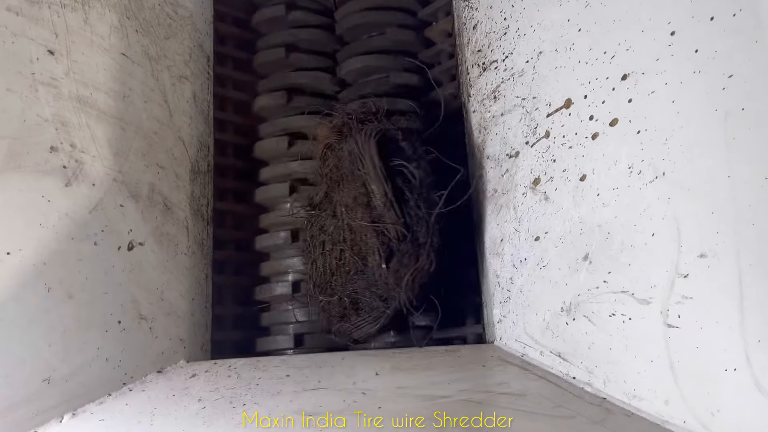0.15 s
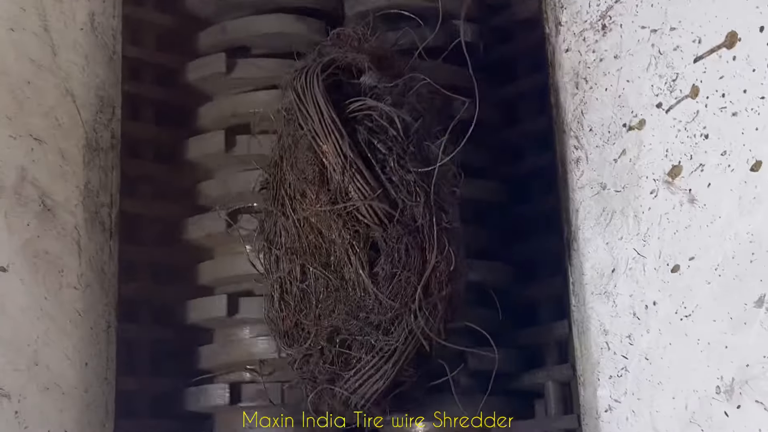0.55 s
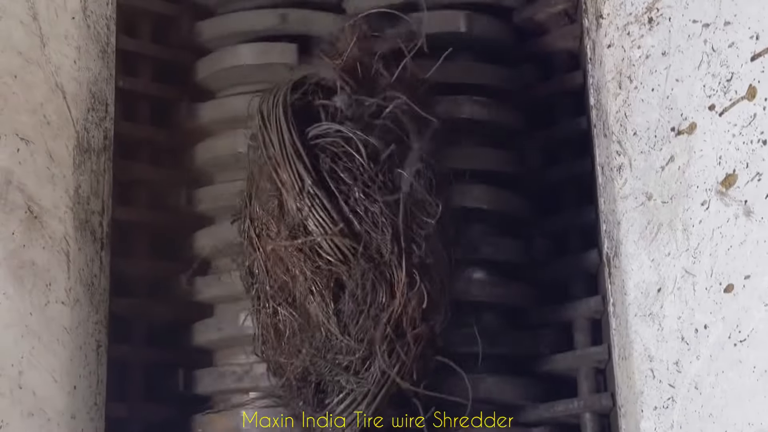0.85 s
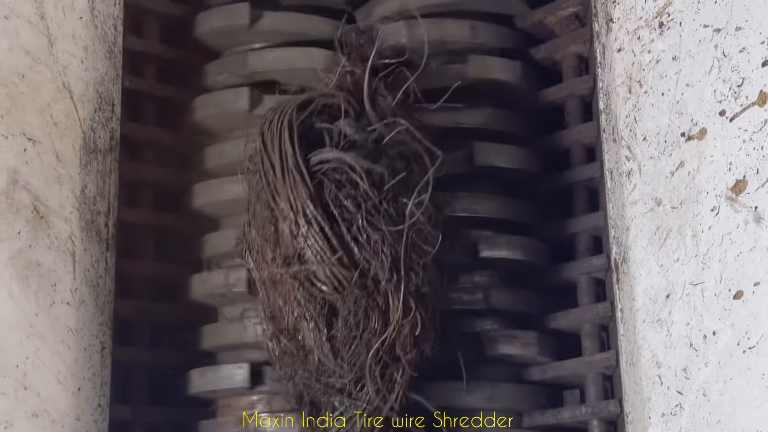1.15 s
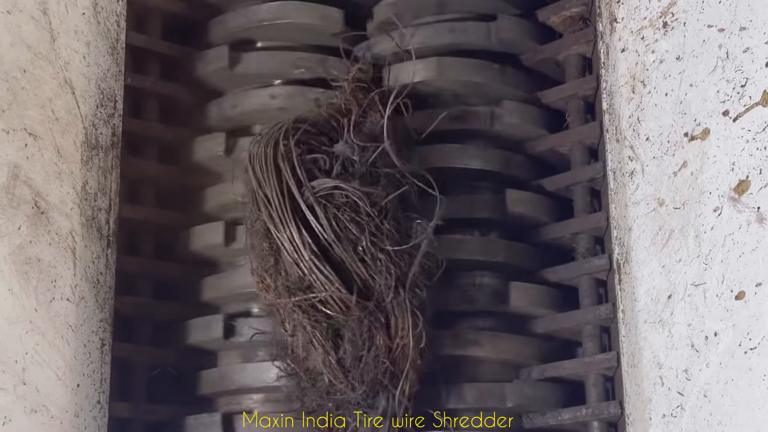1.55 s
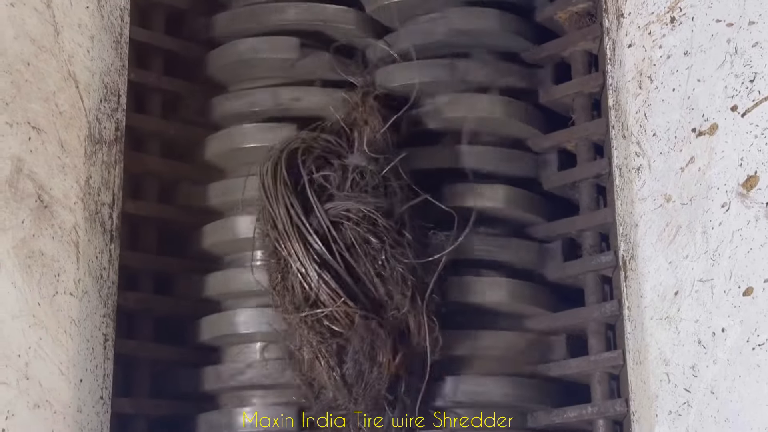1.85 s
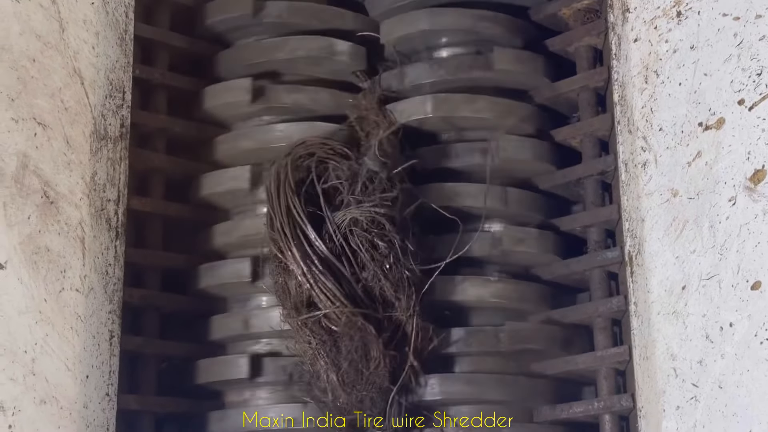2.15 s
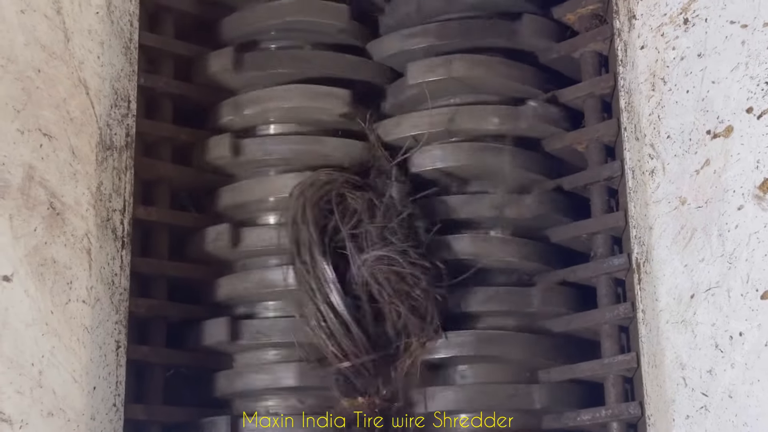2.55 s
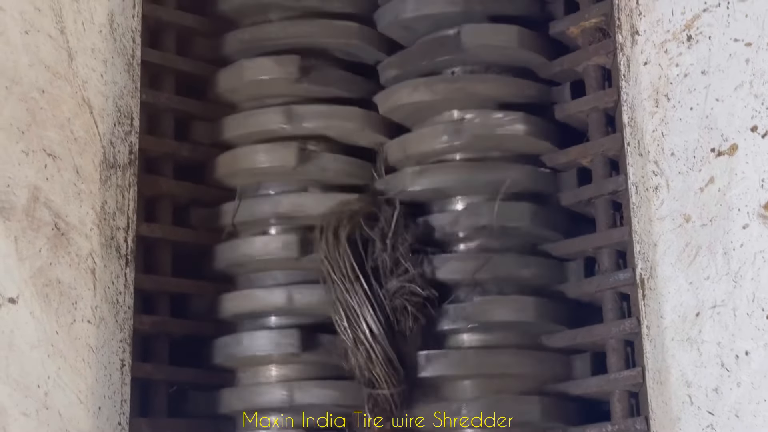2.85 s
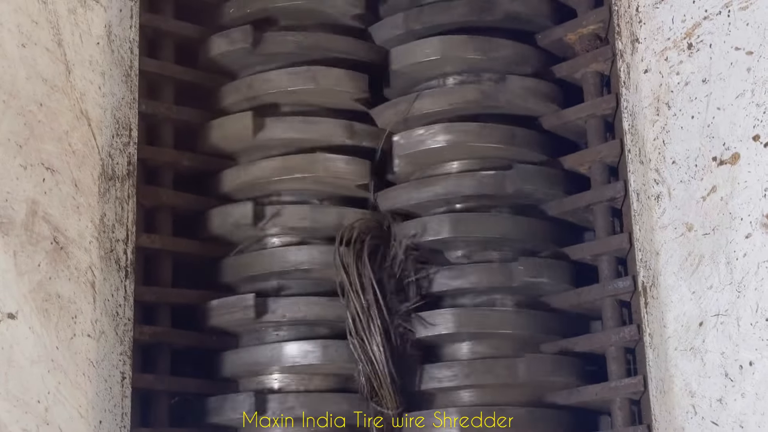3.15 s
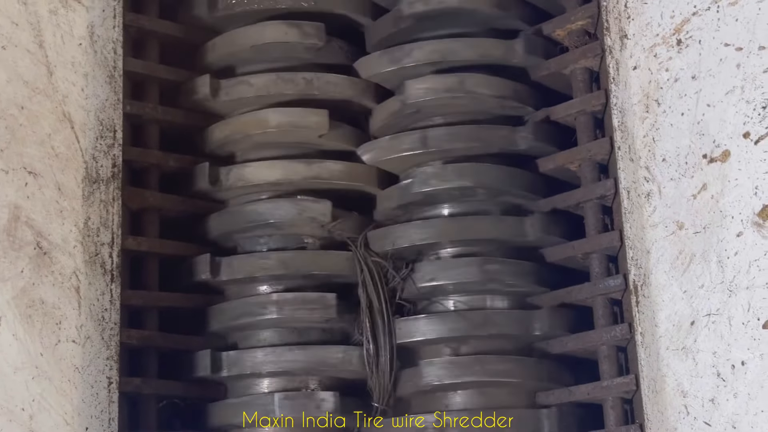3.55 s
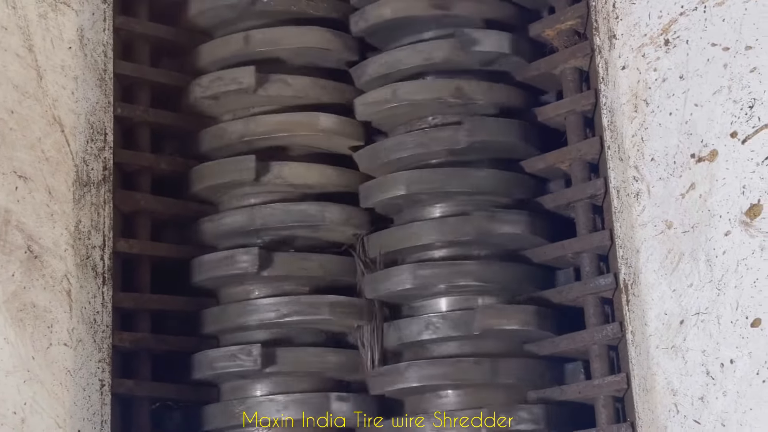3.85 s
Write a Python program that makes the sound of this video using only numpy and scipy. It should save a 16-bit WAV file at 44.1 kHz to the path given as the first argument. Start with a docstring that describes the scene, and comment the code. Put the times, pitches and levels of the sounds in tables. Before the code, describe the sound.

A heavy shredder crunches and snaps steel wire in surges over a low motor hum.

```python
"""Steel wire in a twin-shaft shredder

A stereo microphone just above the steel hopper. About twice a second the cutters bite into a bundle
of wire: strands crackle and snap, and the frame thuds, groans and rings. Loose wire rustles between
the bites, over the swelling hum and rumble of the drive; all eases as the bundle is used up."""
import sys
import numpy as np
from scipy import signal
from scipy.fft import rfft, irfft, next_fast_len
from scipy.io import wavfile

SR = 44100
rng = np.random.default_rng(int(sys.argv[2]) if len(sys.argv) > 2 else 0)


def store_pcm(level_fs):
    """Save levels as 16-bit WAV."""
    pcm = np.round(np.clip(level_fs, -1, 1) * 32767).astype(np.int16)
    wavfile.write(sys.argv[1], SR, np.atleast_2d(pcm).T)


N = 176400
TIME = np.arange(N) / SR


def from_db(db):
    """Decibels to gain."""
    return 10 ** (np.asarray(db) / 20)


def rms_one(x):
    """Scale to rms 1."""
    return x / np.sqrt(np.mean(x ** 2) + 1e-20)


def in_time(rows):
    """Join (seconds, value) rows by straight lines."""
    return np.interp(TIME, *np.transpose(rows))


def at_hz(rows, hz):
    """Read (Hz, value) rows on a log-frequency axis."""
    row_hz, value = np.transpose(rows)
    return np.interp(np.log(hz + 1), np.log(row_hz), value)


def drift(rate_hz):
    """Slow random wander of rms 1."""
    step, settle = 40, 2000
    pole = np.exp(-2 * np.pi * rate_hz * step / SR)
    noise = rng.standard_normal(N // step + settle + 2)
    slow = signal.lfilter([1], [1, -2 * pole, pole * pole], noise)[settle:]
    return np.interp(np.arange(N) / step, np.arange(len(slow)), rms_one(slow))


def swell(start, length, rise, fall):
    """Build up to the start, hold and let go; all times in seconds."""
    return np.exp(np.minimum(TIME - start, 0) / rise - np.maximum(TIME - start - length, 0) / fall)


def burst(start, rise, t60):
    """Two unrelated noises that strike and die away together."""
    return rng.standard_normal((2, N)) * swell(start, 0, rise, fall=t60 / np.log(1000)) + 1e-18


def bandpass(x, low_hz, high_hz, order=1):
    """Keep the band between two frequencies."""
    return signal.sosfilt(signal.butter(order, [low_hz, high_hz], "band", fs=SR, output="sos"), x)


def resonate(x, hz, t60):
    """One ringing mode that falls 60 dB in t60 seconds."""
    radius, angle = from_db(-60 / (t60 * SR)), 2 * np.pi * hz / SR
    return signal.lfilter([1, 0, -1], [1, -2 * radius * np.cos(angle), radius ** 2], x)


def cracks(per_s, spread_db):
    """Random clicks of uneven size; rms 1."""
    sizes = from_db(spread_db * np.minimum(rng.exponential(1, N), 4)) * rng.choice([-1, 1], N)
    return rms_one(sizes * (rng.random(N) < per_s / SR))


def hopper(clicks, t60, direct):
    """Each click is a brief crack followed by dense reflections between the steel walls."""
    t = TIME[:SR // 3]
    crack, tail = from_db(-60 * t / 0.0057), from_db(-60 * t / t60)
    echo = rng.standard_normal((2, len(t))) * (direct * rms_one(crack) + rms_one(tail))
    echo /= np.sqrt(np.sum(echo ** 2, axis=1, keepdims=True))
    return signal.fftconvolve(clicks[None], echo, axes=1)[:, :N]


def crackle(per_s, spread_db, direct, places):
    """Steady crackle from several places along the cutters; rms 1."""
    spots = (cracks(per_s / places, spread_db) for _ in range(places))
    return rms_one(sum(hopper(clicks, t60=0.091, direct=direct) for clicks in spots))


# How alike left and right sound. Each row: frequency in Hz, coherence from 0 to 1.
STEREO_COHERENCE = [(110, .9995), (170, .998), (270, .985), (450, .83), (740, .66), (1200, .56),
                    (1800, .96), (2300, .93), (3500, .93), (4400, .94), (5800, .86), (8500, .88),
                    (11500, .97), (15000, .87)]
# The microphone's left port against its right. Each row: frequency in Hz, phase lead in radians.
PORT_PHASE = [(300, 0), (450, -.2), (600, -.6), (850, -.6), (1210, 0), (1460, .1), (1800, 0), (5400, -.1),
              (7000, -1.2), (9000, -2.3), (10300, -3.0), (13300, -3.2), (15500, -4.2)]
# Left over right. Each row: frequency in Hz, gain in dB.
STEREO_BALANCE = [(800, 0), (1250, -3), (1900, 0)]
def to_stereo(pair, colour=((1, 0), (SR, 0))):
    """Colour two unrelated signals at constant power and blend them into left and right."""
    size = next_fast_len(N + SR // 10)
    hz = np.arange(size // 2 + 1) * SR / size
    mid, side = rfft(pair, size) * rms_one(from_db(at_hz(colour, hz)))
    alike = at_hz(STEREO_COHERENCE, hz)
    mid *= np.sqrt((1 + alike) / 2)
    side *= np.sqrt((1 - alike) / 2)
    lean = np.exp(.5j * at_hz(PORT_PHASE, hz)) * from_db(at_hz(STEREO_BALANCE, hz) / 2)
    return irfft(np.array([(mid + side) * lean, (mid - side) / lean]), size)[:, :N]


# The drive's hum, dead centre, and its rumble. Each row: time in seconds, relative level in dB.
HUM_LEVEL = [(0.0, -14), (0.21, -40), (0.23, -14), (0.3, -7.5), (0.56, -12.5), (0.63, -23), (0.73, -8),
             (0.77, -17), (0.81, -6.5), (0.9, -5.5), (0.95, -16.5), (1.07, -6), (1.15, -7.5), (1.21, -24),
             (1.25, -19), (1.4, -9.5), (1.43, -18), (1.49, -8), (1.79, -11), (1.83, -21), (1.98, -10),
             (2.02, -24.5), (2.16, -12.5), (2.27, -27), (2.32, -20), (2.49, -14), (2.73, -41), (2.91, -13),
             (3.0, -15.5), (3.02, -20), (3.13, -17), (3.19, -28.5), (3.4, -28), (3.45, -14.5), (3.6, -27),
             (4.0, -37.5)]
RUMBLE_LEVEL = [(0, -13), (.22, -33.5), (.42, -20.5), (.55, -27.5), (1.2, -36), (1.35, -19), (1.55, -28),
                (1.73, -37), (1.83, -24), (2.03, -24.5), (2.22, -39), (2.37, -19.5), (2.57, -30.5),
                (2.95, -25), (3.2, -37), (3.93, -46), (4, -32)]
# The note of the hum. Each row: time in seconds, pitch in Hz.
HUM_PITCH = [(0, 112.9), (.3, 110.2), (.62, 111.9), (.8, 108.9), (1.05, 111.2), (1.35, 103.7), (1.5, 109.8),
             (1.75, 113), (1.95, 101), (2.12, 106.8), (2.3, 112.8), (2.52, 103.8), (2.9, 108), (3.2, 112.1),
             (3.5, 110), (4, 111.3)]
# The rumble at the microphone. Each row: frequency in Hz, relative level in dB.
RUMBLE_COLOUR = [(20, -41), (35, -35), (48, -29.5), (60, -7), (72, -12.5), (85, 1.5), (100, 0),
                 (130, -21.5), (200, -23), (600, -62)]
def drive():
    """A strong fluttering hum that sags under load, on top of a low rumble."""
    phase = 2 * np.pi * np.cumsum(in_time(HUM_PITCH) + 0.94 * drift(10)) / SR
    roughness = 0.1 * drift(25)
    flutter_hz = 23 + 3 * drift(2.25)
    flutter = 0.022 * np.sin(2 * np.pi * np.cumsum(flutter_hz) / SR)
    hum = np.sqrt(2) * from_db(in_time(HUM_LEVEL) + 0.3) * (1 + roughness + flutter) * np.sin(phase)
    rumble = to_stereo(rng.standard_normal((2, N)), RUMBLE_COLOUR)
    return hum + from_db(in_time(RUMBLE_LEVEL) + 4.5) * rumble


# The gearbox, faint and central. Each row: pitch in Hz, average level in dB.
GEAR_TONES = [(179, -44.5), (332, -40), (382, -41.5), (469, -39), (595, -41), (640, -42.5), (838, -50.5),
              (964, -76)]
def gearbox(load_db):
    """The gears whine in rough, wavering tones, stronger under load."""
    tones = 0
    for hz, db in GEAR_TONES:
        level = from_db(db + 3 * drift(35))
        pitch = hz + 6.18 * drift(26)
        tones += level * np.sin(2 * np.pi * np.cumsum(pitch) / SR)
    return np.sqrt(2) * tones * from_db(0.79 * (load_db - load_db.mean()))


def cutter_hiss():
    """The turning cutters hiss steadily, with a faint high ring."""
    colour = [(1500, 4), (3500, -3), (4600, -18), (4930, 11), (5300, -19), (8000, 2), (16000, -1)]
    return from_db(-56) * to_stereo(rng.standard_normal((2, N)), colour)


# The bundle dragging, down in the hopper. Each row: time in seconds, level in dB.
DRAG_LEVEL = [(0, -30), (.5, -32.5), (.62, -28), (.87, -33.5), (1.0, -32), (1.12, -32.5), (1.24, -26.5),
              (1.5, -34.5), (1.63, -40), (1.8, -55), (2.07, -25.5), (2.15, -37.5), (2.3, -26),
              (2.52, -29.5), (2.68, -36), (2.87, -29), (2.96, -27.5), (3.02, -32.5), (3.22, -45.5),
              (3.3, -43), (3.41, -34), (3.48, -41), (3.52, -47), (3.6, -51), (3.7, -47), (3.95, -49),
              (3.965, -35), (4, -41)]
# That scrape from above. Each row: frequency in Hz, relative level in dB.
DRAG_COLOUR = [(200, -10), (600, 6.5), (1020, 2), (1400, 0), (2200, -1), (3200, -5), (5000, -10.5),
               (8000, -13.5), (11000, -22), (16000, -35)]
def drag():
    """The bundle scrapes along the cutters in a dense, even crackle."""
    scrape = crackle(per_s=1100, spread_db=0.5, direct=0.9, places=3)
    return to_stereo(from_db(in_time(DRAG_LEVEL)) * scrape, DRAG_COLOUR)


# Loose wire close under the microphone. Each row: time in seconds, relative level in dB.
RUSTLE_LEVEL = [(0, -28), (.08, -31.5), (.13, -25), (.27, -22), (.33, -31), (.44, -36), (.56, -31.5),
                (.63, -27), (.77, -28.5), (.89, -39), (.93, -37), (1.08, -39), (1.2, -27.5), (1.29, -24),
                (1.4, -41), (1.6, -38.5), (1.72, -30.5), (1.87, -28), (1.97, -45), (2.12, -46),
                (2.2, -30.5), (2.35, -26.5), (2.5, -51), (2.64, -43), (2.73, -32), (2.9, -36), (2.98, -43),
                (3.25, -43), (3.275, -34.5), (3.44, -37.5), (3.55, -55), (3.74, -63), (3.84, -45),
                (4, -37.5)]
# Its bright tone at this range. Each row: frequency in Hz, relative level in dB.
RUSTLE_COLOUR = [(120, -40), (500, 2), (1200, 0.5), (3500, -4.5), (7000, 2), (10000, -0.5), (12500, -12),
                 (14500, 7), (16000, 2.5)]
def rustle():
    """Loose strands brush the cutters and each other: many small ticks, a few large."""
    ticks = crackle(per_s=1400, spread_db=4.5, direct=0.31, places=4)
    return to_stereo(from_db(in_time(RUSTLE_LEVEL) + 1.5) * ticks, RUSTLE_COLOUR)


# The load that rattles the frame. Each row: time in seconds, relative level in dB.
FRAME_LOAD = [(0, -23), (.5, -21), (.62, -27), (1.0, -19.5), (1.2, -22.5), (1.5, -20), (1.68, -25),
              (2.05, -22), (2.2, -26), (2.5, -23), (2.7, -29), (3.02, -22), (3.22, -35.5), (3.46, -27),
              (3.6, -37), (3.88, -36), (4, -28)]
# The frame, dull from above the hopper. Each row: frequency in Hz, relative level in dB.
FRAME_COLOUR = [(60, -34), (130, 5.5), (170, 0.5), (220, 4), (260, 0.5), (320, 0), (420, -6.5), (620, -7),
                (800, -15), (1100, -19), (3000, -43)]
def frame_clatter(thud_force):
    """Jolts rattle the frame all the time and swell to a thud in the bites."""
    force = np.hypot(thud_force, from_db(in_time(FRAME_LOAD)))
    jolts = crackle(per_s=500, spread_db=3, direct=0.48, places=3)
    return from_db(-0.5) * to_stereo(force * jolts, FRAME_COLOUR)


# Modes of the steel below the microphone. Each row: pitch in Hz, relative level in dB, t60 in seconds.
STEEL_MODES = [(194, -4, 0.49), (318.4, -1.5, .25), (379.2, -1.5, 1), (464, -16, 0.55), (636, -0.5, 0.065),
               (831.7, 0.5, 0.33), (1213, -5, 0.22), (1334, -10, 0.32), (1708, -10, 0.29),
               (1922, -8.5, 0.08), (2037, -11, 0.19), (2196, -7, 0.23), (2730, -9.5, 0.089),
               (2800, -24, 0.12), (2910, -22, 0.31), (3690, -23, 1)]
def steel_ring(grind_force):
    """Grinding and dragging set the cutters and hopper ringing."""
    rub = np.hypot(grind_force, from_db(in_time(DRAG_LEVEL)))
    jolts = rub * np.array([cracks(per_s=900, spread_db=-1) for _ in range(2)])
    ring = sum(from_db(db) * rms_one(resonate(jolts, hz, t60)) for hz, db, t60 in STEEL_MODES)
    return to_stereo(from_db(-28) * rms_one(ring))


# Single strands parting at close range. Each row: start in seconds, relative level in dB.
SNAPS = [(0.0546, -15), (0.1092, -29), (0.1267, -13), (0.187, -19), (0.267, -17), (0.4654, -21),
         (0.4865, -13.5), (0.6328, -14), (0.6634, -11.5), (0.7656, -15), (0.9077, -19), (0.9234, -17),
         (1.0625, -16.5), (1.2186, -19), (2.7657, -28), (2.9013, -15), (3.1173, -25), (3.4775, -23.5),
         (3.6212, -35), (3.7262, -31), (3.7554, -38), (3.765, -24), (3.7958, -23), (3.931, -28),
         (3.9619, -19.5)]
# Their tick at the microphone. Each row: frequency in Hz, relative level in dB.
SNAP_COLOUR = [(100, -42), (500, -3), (2500, 1.5), (5000, -3), (9000, 2.5), (16000, 4)]
def snaps():
    """Single strands part with a bright tick that echoes in the hopper."""
    out = 0
    for start, db in SNAPS:
        click = from_db(db + 16.5) * signal.unit_impulse(N, int(start * SR))
        out += hopper(click, t60=0.057, direct=0.4)
    return to_stereo(out, SNAP_COLOUR)


# Thick strands giving way in the hopper. Each row: start in seconds, relative level in dB, centre in Hz.
BREAKS = [(.1895, -4, 2600), (0.224, -1, 2000), (.673, 5.5, 2120), (.6948, 2.5, 2100), (0.7648, 1, 3000),
          (0.785, 3, 1880), (0.91, 4, 2634), (1.264, 0.5, 2404), (1.31, 2, 1810), (1.344, 6.5, 2186),
          (1.8213, 4.5, 3450), (1.86, 2.5, 3990), (1.877, 1.5, 4220), (2.31, 5.5, 2190), (2.362, 3.5, 3940),
          (2.369, 1, 3240), (2.3895, 5.5, 3950), (2.397, -4, 3020), (2.412, -0.5, 3220),
          (2.561, -3.5, 1800), (2.806, -2, 2200), (2.8933, 4.5, 2190), (2.901, 0.5, 4480), (2.916, 1, 3310),
          (2.93, 1.5, 3700), (3.962, -16, 1790)]
def breaks(half_octaves=0.68, detune=0.0344):
    """A thick strand parts: one hard crack that echoes in the hopper, and a short ring of close modes."""
    out = 0
    for start, db, hz in BREAKS:
        click = from_db(db) * signal.unit_impulse(N, int(start * SR))
        crack = hopper(from_db(9.5) * click, t60=0.057, direct=0.18)
        out += bandpass(crack, hz / 2 ** half_octaves, hz * 2 ** half_octaves)
        modes_hz = hz * (1 + detune * rng.uniform(-1, 1, size=3))
        ring = np.mean([resonate(click + 1e-18, mode, t60=0.27) for mode in modes_hz], axis=0)
        out[0] += from_db(-29) * ring  # mid signal only, so the ring sits near the centre
    return to_stereo(out)


# The cutters biting, just below the microphone. Each row: start and length in seconds,
# levels of grind, splinter and thud in dB, rise and fall in seconds.
BITES = [(0.216, 0.034, -18, -31.5, -35, 0.051, 0.061), (0.67, 0.048, -22, -28, -19.5, 0.0079, 0.041),
         (0.767, 0.044, -21.5, -28.5, -15.5, 0.027, 0.037), (0.918, 0.034, -23, -24.5, -36, 0.0045, 0.036),
         (1.283, 0.095, -21, -23.5, -21, 0.023, 0.055), (1.809, 0.061, -20.5, -23.5, -16.5, 0.078, 0.089),
         (2.308, 0.1, -26.5, -23, -16.5, 0.008, 0.051), (2.558, .012, -27.5, -59, -25, 0.0027, 0.019),
         (2.797, .015, -26.5, -36, -37.5, 0.021, 0.093), (2.888, 0.033, -24, -22, -15, 0.0057, 0.032)]
def bite_forces():
    """Each bite builds, holds and lets go: the strength of grind, splinter and thud over time."""
    powers = ((from_db(levels)[:, None] * swell(start, length, rise, fall)) ** 2
              for start, length, *levels, rise, fall in BITES)
    return np.sqrt(sum(powers))


# Grinding and sharper splintering, heard from above. Each row: frequency in Hz, relative level in dB.
GRIND_COLOUR = [(50, -47), (200, -4.5), (500, 3.5), (800, 5.5), (1020, -0.5), (1500, 0), (2200, 1),
                (3000, -6.5), (4500, -18.5), (7000, -17), (12000, -79)]
SPLINTER_COLOUR = [(800, -11), (2400, 6), (3600, 7), (5000, 3), (7000, 1.5), (9700, -2), (12000, -42),
                   (16000, -16)]
def chewing(grind_force, splinter_force):
    """Strands caught in a bite grind and splinter in a rush of small cracks."""
    grind = grind_force * crackle(per_s=900, spread_db=2.5, direct=0.78, places=2)
    splinter = splinter_force * crackle(per_s=700, spread_db=2.5, direct=0.27, places=2)
    return to_stereo(grind, GRIND_COLOUR) + to_stereo(splinter, SPLINTER_COLOUR)


# The frame groaning, dead centre. Each row: start and length in seconds, pitch in Hz, level in dB.
GROANS = [(0.243, 0.15, 568, -33), (0.672, 0.015, 636, -20), (0.709, 0.086, 468, -21),
          (0.935, 0.063, 495, -21), (0.936, 0.035, 370, -24), (1.279, 0.079, 241, -13.5),
          (1.773, 0.086, 242, -16.5), (1.794, 0.097, 846, -25), (2.303, 0.084, 220, -18.5),
          (2.361, 0.034, 840, -21.5), (2.564, 0.016, 857, -26), (2.6, 0.12, 946, -33),
          (2.791, 0.1, 244, -19.5)]
def groans(t60=0.11):
    """Stick and slip of the jammed bundle drives single resonances of the frame."""
    out = 0
    for start, length, hz, db in GROANS:
        friction = rng.standard_normal(N) * swell(start, length, rise=0.022, fall=0.0058)
        tone = resonate(friction + 1e-12, hz, t60)
        power = np.sum(tone ** 2) / (SR * (length + t60 / 10))
        out += from_db(db) * tone / np.sqrt(power)
    return out


# Blows to the frame below. Each row: start in seconds, level in dB, centre in Hz, t60 in seconds.
KNOCKS = [(.283, -14.5, 326, 0.13), (0.329, -13, 280, 0.21), (0.787, -14, 646, 0.043),
          (0.95, -19.5, 546, 0.18), (1.811, -15.5, 730, 0.1), (2.315, -11.5, 378.2, .13),
          (2.562, -16, 670, .11), (2.894, -13, 664, 0.062)]
def knocks(half_octaves=0.84):
    """A cutter slams into the bundle: a dull boom of the frame that dies away in the hopper."""
    out = 0
    for start, db, hz, t60 in KNOCKS:
        blow = burst(start, rise=0.001, t60=t60)
        boom = bandpass(blow, hz / 2 ** half_octaves, hz * 2 ** half_octaves, order=2)
        power = np.sum(boom ** 2) / (SR * t60 / np.log(1000))
        out += from_db(db) * boom / np.sqrt(power)
    return to_stereo(out)


# Thin strands near the microphone. Each row: start in seconds, relative level in dB, pitch in Hz.
ZINGS = [(0.91, -12, 9800), (0.926, -7.5, 9800), (0.944, -8.5, 9700), (1.062, -10, 9650)]
def zings():
    """A thin strand springs free with a short, high, noisy ring."""
    out = 0
    for start, db, hz in ZINGS:
        flick = burst(start, rise=0.00055, t60=0.074)
        out += from_db(db) * bandpass(flick, hz / 1.07, hz * 1.05)
    return to_stereo(out)


def scene():
    """Running machine, shaken frame and tearing wire, all from just above the hopper."""
    grind, splinter, thud = bite_forces()
    machine = drive() + gearbox(load_db=in_time(FRAME_LOAD)) + cutter_hiss()
    frame = frame_clatter(thud) + steel_ring(grind) + groans() + knocks()
    wire = drag() + rustle() + snaps() + breaks() + chewing(grind, splinter) + zings()
    return machine + frame + wire


def record(dry):
    """The highest peaks are rounded and the treble is cut above 15.9 kHz."""
    rounded = dry / (1 + np.abs(dry) ** 8) ** (1 / 8)
    return signal.sosfilt(signal.ellip(12, .1, 90, 15900, fs=SR, output="sos"), rounded)


dry = scene()
out = record(dry)
store_pcm(out)
```